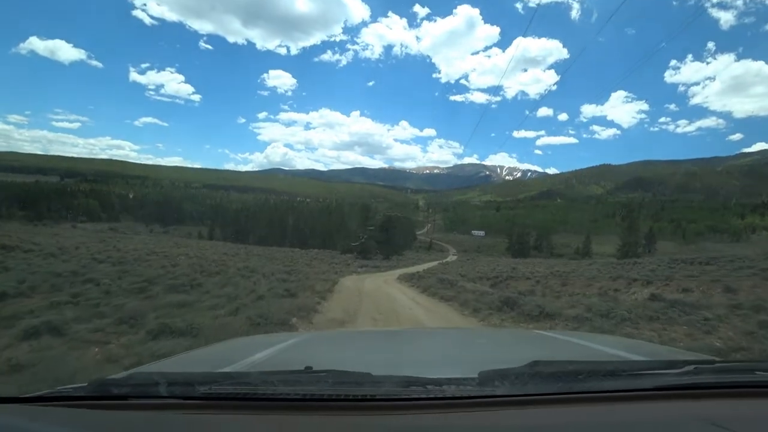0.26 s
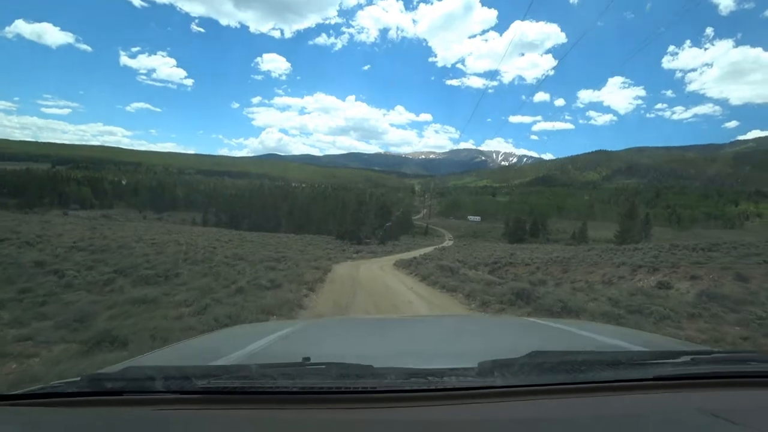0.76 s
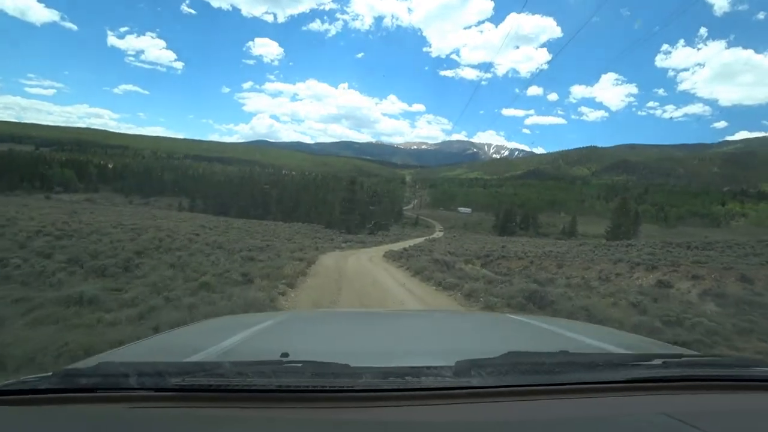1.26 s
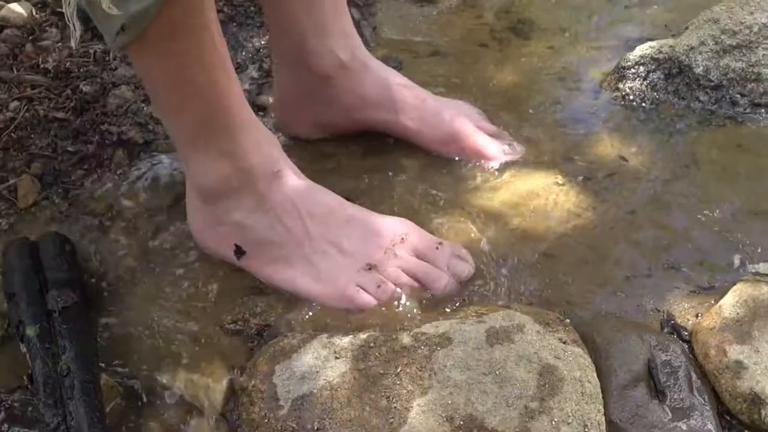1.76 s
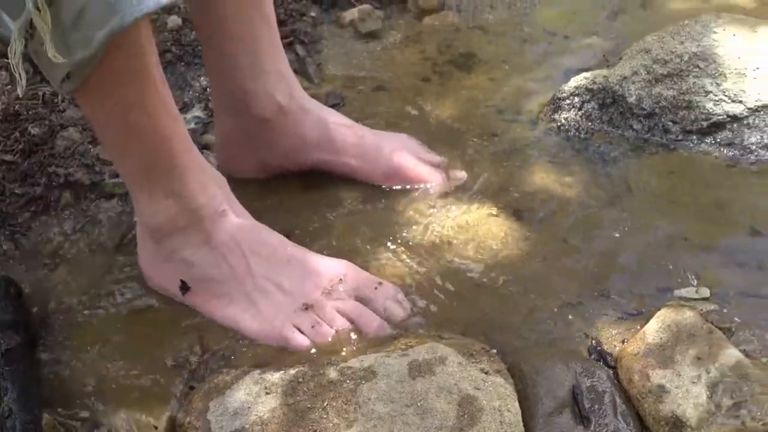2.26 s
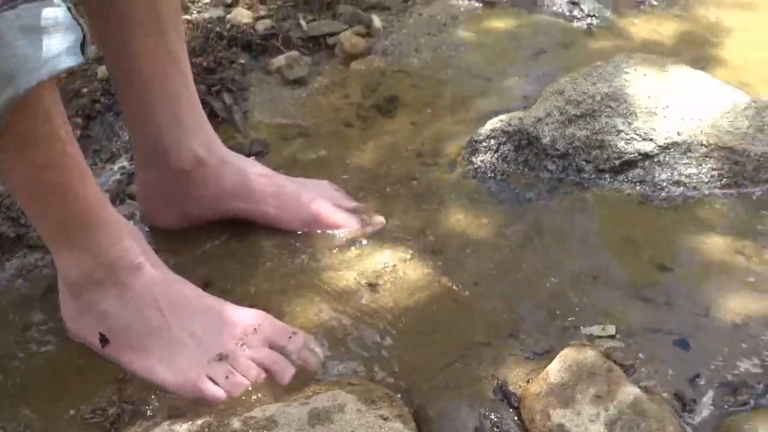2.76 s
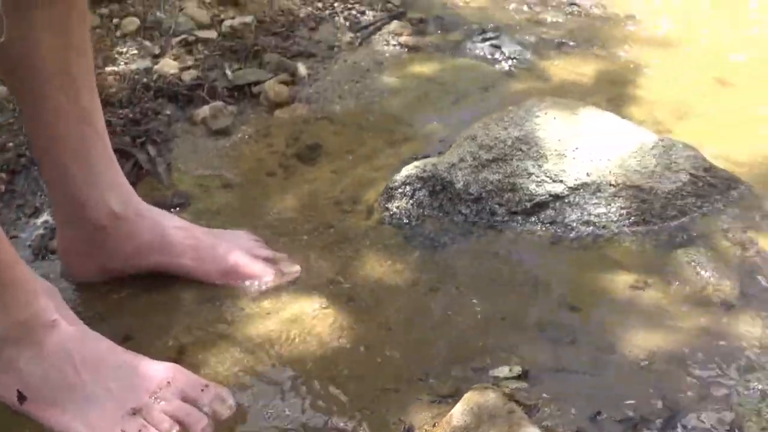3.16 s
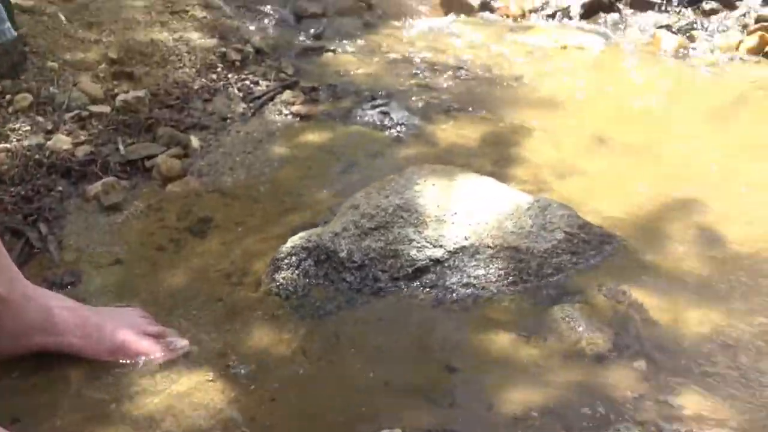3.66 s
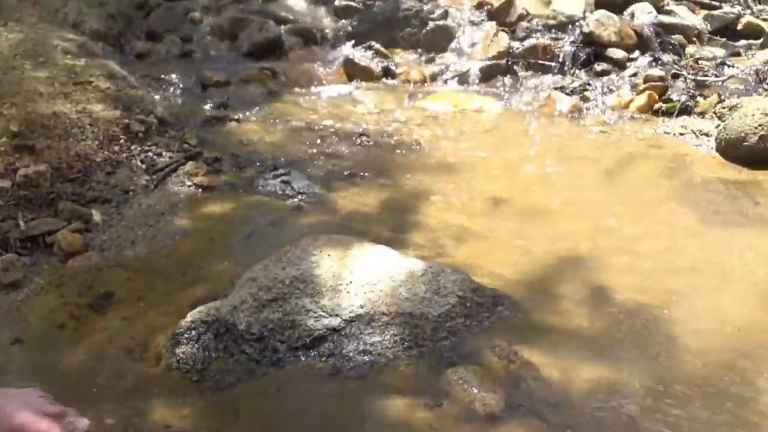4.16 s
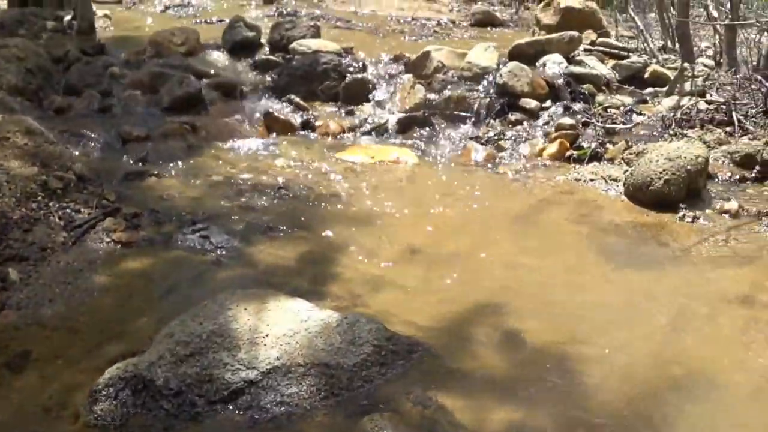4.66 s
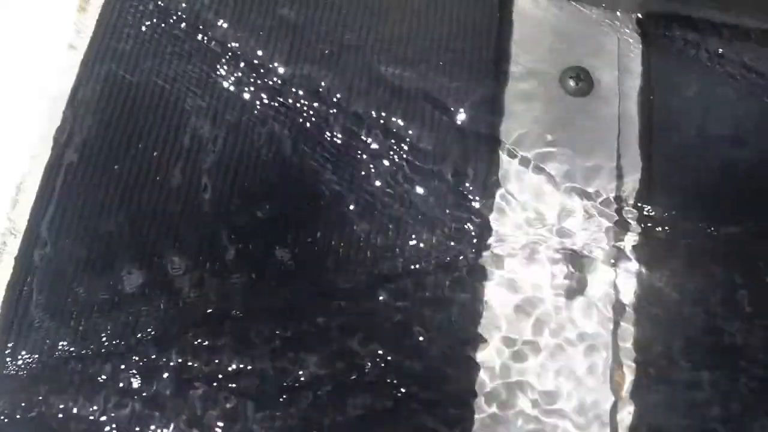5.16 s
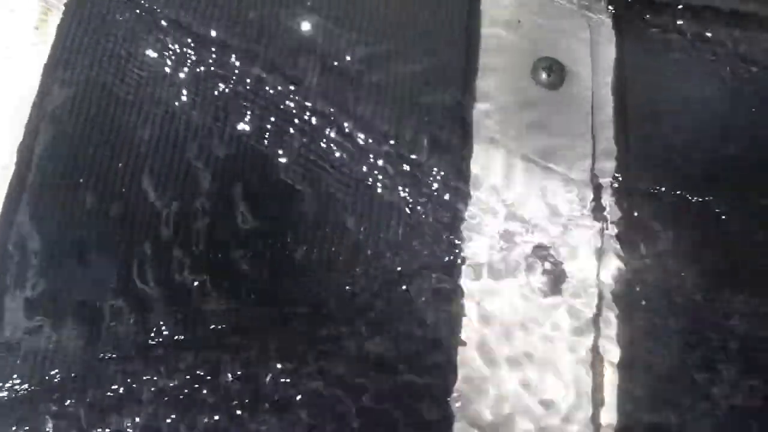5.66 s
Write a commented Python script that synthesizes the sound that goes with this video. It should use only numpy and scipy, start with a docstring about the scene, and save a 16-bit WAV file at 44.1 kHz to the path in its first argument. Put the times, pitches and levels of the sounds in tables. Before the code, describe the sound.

From 0 to about 1.8 s we are inside a car rolling along a dirt road: low-level, muffled, uneven tyre crunch with fine grit, and loose trim giving short hollow knocks at the very start, in a cluster around 0.65 to 0.9 s, at 1.05 s, 1.35 s and 1.5 to 1.6 s. Soft low body booms come near 0.66 and 1.7 s. At 1.8 s it cuts to a shallow creek running over stones, close and much louder: steady fine crackling trickle and spray, rounded low plops, bright high plinks, small splashes and spatters, notably around 2.4, 3.3, 3.7 and 4.7 s. At 5.1 s it cuts to water pouring down a ribbed sluice: fuller, faster, gurgling, slightly hollow, gushing and slackening, with a faint low thump near 5.2 s and more bubbles, ending abruptly at about 5.9 s. The water has only brief, dull reflections.

```python
"""Dirt road, creek and sluice

Three outdoor moments in a row. A car rolls along a dirt road, heard from inside: shaped noise for the tyres,
decaying sines and crunches for the trim knocking on bumps, low sines for the ruts. Then a shallow creek runs
over stones close by, and at last water pours down a ribbed sluice. The water is thousands of short bubble
tones, born in surges, over a noise wash of spray. Single bubbles plop out, the listed ones each with a splash;
now and then the water spatters, and faint short pulses of low noise lie beneath it."""
import sys
import numpy as np
from scipy import signal
from scipy.fft import rfft, irfft
from scipy.io import wavfile
from scipy.ndimage import uniform_filter1d

SR = 44100
rng = np.random.default_rng(int(sys.argv[2]) if len(sys.argv) > 2 else 0)


def log_audio(samples):
    """Write samples as a 16-bit WAV file to the path given in sys.argv[1]."""
    # one column per channel
    frames = np.atleast_2d(samples).T
    # limit to full scale, then quantise
    limited = np.clip(frames, -1, 1)
    pcm = np.round(limited * 32767).astype(np.int16)
    wavfile.write(sys.argv[1], SR, pcm)


N = 260631
TIME = np.arange(N) / SR
FREQS = np.arange(N // 2 + 1) * SR / N

CREEK_START_S, SLUICE_START_S, END_S = 1.775, 5.108, 5.91
CUTOFF_HZ = 11120
# the low gurgle hands over to the high spray here
GURGLE_TOP_HZ = 2800
# below this, left and right grow alike
ALIKE_BELOW_HZ = 570

# tone colour of the cabin noise, relative: (frequency [Hz], density [dB per Hz])
CABIN_COLOUR = [(20, -12.5), (60, -3), (200, -1), (420, 1), (720, 1), (1000, 2.5), (1350, -2.5), (1900, 1),
                (2350, -5), (3100, -9.5), (4500, -14.5), (6200, -17), (8000, -17.5), (11000, -24)]
# left-right likeness in the cabin, before its ceiling: (frequency [Hz], likeness [0-1])
CABIN_LIKENESS = [(60, 1), (130, 1), (270, 1), (560, 0.58), (1180, 0.33), (2490, 0.069), (5260, 0.4),
                  (11100, 1)]
# tyres on dirt, louder over the rough patches: (time [s], level [dB])
ROAD_LEVEL = [(0, -46), (0.27, -47.5), (0.42, -45), (0.57, -47.5), (0.65, -44.5), (0.76, -45),
              (0.84, -48.5), (1.03, -44.5), (1.12, -47.5), (1.16, -47), (1.3, -49), (1.36, -45),
              (1.42, -48), (1.77, -48)]
# trim knocking on bumps: (time [s], level [dB], crunch against the ring before its trim [dB])
KNOCKS = [(0.0189, -33, -31), (0.124, -43, -6), (0.658, -38, -10), (0.664, -36, -12), (0.7095, -34, -14),
          (0.7138, -32.5, -11), (0.815, -40.5, -8), (0.862, -37, -15), (1.0445, -31.5, -22),
          (1.119, -38.5, -12), (1.345, -39, -2), (1.353, -46, -16), (1.517, -39, -27), (1.604, -39, -30)]
# ringing modes of the loose trim: (middle frequency [Hz], relative level [dB], t60 [s])
TRIM_MODES = [(724, -6, 0.04), (940, 1, 0.026), (1130, -10, 0.0088), (1660, 4, 0.0042)]
# the car's body booms over a rut: (time [s], pitch [Hz], level [dB])
RUTS = [(0.657, 310, -50), (1.686, 240, -46.5)]

# flow of the creek, before its trims: (time [s], gurgle [dB], spray [dB])
CREEK_FLOW = [(1.8, -34, -35.5), (1.9, -31.5, -35), (2.0, -34.5, -34), (3.5, -34, -33.5), (3.85, -35, -33),
              (4.25, -35, -32), (5.05, -34, -33)]
# flow of the sluice, slackening between gushes, before its trims: (time [s], gurgle [dB], spray [dB])
SLUICE_FLOW = [(5.13, -26.5, -32.5), (5.3, -25.5, -35), (5.42, -27.5, -34), (5.48, -28, -38),
               (5.55, -26, -32.5), (5.75, -26, -35.5), (5.8, -26.5, -35.5), (5.9, -27, -34)]
# tone colour of the creek, relative: (frequency [Hz], density [dB per Hz])
CREEK_COLOUR = [(70, -23), (130, -26), (200, -23.5), (310, -13), (400, -7), (550, 0.5), (720, -2),
                (1200, -0.5), (2300, -5), (3500, -14), (5400, -19), (7400, -17.5), (9000, -20),
                (11000, -22.5)]
# tone colour of the sluice, relative: (frequency [Hz], density [dB per Hz])
SLUICE_COLOUR = [(70, -47), (130, -36), (220, -29.5), (340, -17.5), (500, -9), (720, -10), (900, -11),
                 (1250, -7.5), (1800, -7), (2700, -7), (4200, -8.5), (6800, -9), (9000, -11.5),
                 (11000, -15)]
# wavelets slop over or draw back in a lull: (time [s], gurgle change [dB], spray change [dB])
WAVELETS = [(1.825, -2, 1), (1.879, -0.5, 0.5), (1.958, -1, 2), (2.0, 0.5, 0.5), (2.335, 2, 1.5),
            (2.445, 0.5, 3), (2.818, 2, 1.5), (2.881, 0.5, 2.5), (2.97, -3.5, -4), (3.006, 0.5, 3),
            (3.147, 3.5, -0.5), (3.262, -1, -2), (3.45, -1.5, 1), (3.48, 1.5, 0), (3.85, -1.5, -1),
            (4.21, 3.5, 2), (4.375, -5.5, -2), (4.423, 2.5, 3.5), (4.53, -1.5, 0), (4.63, -3, 3),
            (4.693, 0.5, 0.5), (4.84, -1, -3), (4.876, 1.5, 1), (5.02, 0, -2), (5.137, 1.5, -0.5),
            (5.266, -0.5, 4.5), (5.408, 3, 3), (5.747, 0.5, 5)]
WAVELET_S = 0.018  # from its height down to 1/e, either side

# the largest, nearest bubbles: (time [s], pitch [Hz], level [dB], time to full swing [cycles])
PLOPS = [(1.7816, 548, -22, 1.56), (1.8549, 626, -30, 1.4), (1.8934, 1760, -26, 3.2), (1.915, 1730, -22, 3),
         (1.92, 1120, -24.5, 2.9), (1.926, 492, -28.5, 2.3), (1.9586, 4440, -23, 1),
         (1.996, 574, -30.5, 2.8), (1.9971, 2800, -28.5, 6.6), (2.083, 4440, -19, 2.8),
         (2.113, 1720, -20, 2.6), (2.123, 541, -26.5, 2.1), (2.148, 2680, -25, 4), (2.1798, 548, -22, 1.13),
         (2.2652, 4320, -26, 6), (2.282, 1210, -24, 0.93), (2.2935, 1130, -27, 0.95),
         (2.326, 3040, -22, 1.8), (2.3475, 5940, -21, 0.6), (2.3703, 9070, -16.5, 0.6),
         (2.3813, 6340, -21, 0.6), (2.3854, 5570, -19.5, 0.72), (2.392, 2360, -13.5, 0.6),
         (2.4041, 4730, -20, 1), (2.4178, 810, -26.9, 4), (2.4279, 2190, -23.5, 3.4),
         (2.455, 5200, -23, 1.4), (2.4968, 3100, -25.5, 1.8), (2.5113, 430, -29.5, 1.2),
         (2.5761, 1200, -26.5, 5.2), (2.585, 7100, -25, 10), (2.6778, 3420, -21, 1.8),
         (2.7156, 587, -30.5, 2.1), (2.7185, 1070, -17, 0.5), (2.722, 2830, -16.5, 0.85),
         (2.735, 4470, -20, 3.2), (2.785, 4730, -22, 1.4), (2.7915, 2160, -25, 5), (2.812, 1580, -27, 4.1),
         (2.9339, 1320, -25, 1.8), (2.9367, 540, -28, 1.6), (2.995, 2900, -23, 1.7),
         (3.0463, 4440, -25, 1.6), (3.0676, 6700, -13, 1.8), (3.0993, 1740, -21, 1.8),
         (3.1051, 3480, -19, 2.2), (3.142, 1310, -29, 6.4), (3.1561, 7400, -17, 2),
         (3.2795, 4670, -21, 2.3), (3.2967, 7960, -18, 0.85), (3.315, 830, -24.5, 2.3),
         (3.3238, 610, -23, 1.3), (3.3327, 2380, -20.5, 1.7), (3.3417, 6460, -21, 2.8),
         (3.4102, 1060, -24, 0.93), (3.474, 1980, -21, 0.99), (3.4816, 2470, -21, 1.8),
         (3.5078, 516, -25.5, 1.1), (3.514, 10000, -20, 1.5), (3.5155, 1220, -24, 2.9),
         (3.5385, 1130, -23, 0.49), (3.5829, 770, -24, 0.85), (3.607, 970, -27, 2),
         (3.628, 4560, -14.5, 2.6), (3.682, 6550, -12, 1.3), (3.687, 3570, -8, 1.5),
         (3.7251, 7560, -20.5, 2), (3.7857, 565, -27, 2.2), (3.882, 7160, -19, 3), (3.9221, 8300, -13, 1.8),
         (3.923, 3530, -16.5, 1.3), (3.939, 2500, -22, 4), (4.0009, 587, -27.5, 2.5),
         (4.0098, 2740, -24.5, 4), (4.058, 2470, -19, 1.3), (4.0742, 2350, -24.6, 2.3),
         (4.076, 4440, -19.2, 0.65), (4.086, 7900, -21, 3), (4.2045, 1480, -21.5, 3.3),
         (4.2287, 7460, -19, 5.2), (4.2888, 3000, -21, 1.1), (4.3076, 2910, -20, 0.85),
         (4.3334, 3000, -24, 1.1), (4.3868, 500, -27.5, 2), (4.4183, 2080, -23, 3),
         (4.419, 3900, -18.5, 0.6), (4.471, 4290, -17, 1), (4.4964, 4160, -14, 0.54),
         (4.5013, 5220, -19.8, 0.85), (4.504, 10100, -11.5, 2), (4.528, 2320, -15, 1.9),
         (4.53, 4890, -18, 1.3), (4.5582, 9900, -19, 1.3), (4.6014, 8230, -15.5, 1.6),
         (4.626, 7220, -19, 1.1), (4.6328, 3620, -24, 3.7), (4.6874, 2110, -11.5, 1.4),
         (4.6978, 5200, -16, 1.9), (4.7045, 6100, -15, 1.2), (4.7582, 7460, -20, 1.8),
         (4.8694, 3400, -23.5, 5.1), (4.874, 10000, -17, 0.6), (4.9614, 6700, -17.5, 1.8),
         (4.99, 2500, -16.5, 1.2), (5.058, 542, -31, 1.6), (5.0949, 3060, -13.5, 1.2),
         (5.1088, 2800, -14, 0.6), (5.1343, 6800, -19.5, 4.4), (5.138, 1650, -18, 0.7),
         (5.19, 760, -25, 2.1), (5.206, 630, -15, 0.49), (5.221, 3550, -19.5, 1.6),
         (5.222, 9000, -14.5, 0.86), (5.2429, 500, -25, 1.7), (5.267, 755, -25.5, 1.3),
         (5.294, 2280, -18, 2.4), (5.306, 656, -16, 1.2), (5.314, 580, -23.5, 1.9),
         (5.351, 1620, -17.5, 1.5), (5.3794, 544, -23, 2), (5.4108, 680, -19.5, 0.95),
         (5.41, 5200, -14.5, 0.69), (5.4137, 1980, -21, 1.8), (5.42, 1060, -21.5, 1.1),
         (5.491, 4890, -20, 1.5), (5.517, 1830, -25, 3), (5.5636, 6340, -19, 0.84),
         (5.5828, 10300, -13, 1.6), (5.654, 2640, -24, 3), (5.6852, 720, -19.5, 1.9),
         (5.696, 490, -25, 1.6), (5.7051, 720, -23.5, 3.8), (5.735, 5940, -15, 0.75),
         (5.7452, 1640, -19, 1.6), (5.7485, 6550, -18, 2.5), (5.7552, 1790, -18.5, 1.8),
         (5.786, 498, -27.5, 2), (5.81, 2570, -21, 1.4), (5.8662, 6500, -13.5, 3.4)]
# lesser chance bubbles, low: (rate [per s], middle pitch [Hz], spread either way [octaves],
# middle level [dB], middle time to full swing [cycles])
GLUGS = (10, 950, 0.7, -33, 2.6)
# lesser chance bubbles, high: (rate [per s], middle pitch [Hz], spread either way [octaves],
# middle level [dB], middle time to full swing [cycles])
PLINKS = (12, 6000, 0.8, -29, 2.2)
STRAY_SPREAD_DB = 3  # either way
# a plop's splash: level against the plop, fade, reach either side of its pitch
SPLASH_DB, SPLASH_FADE_S, SPLASH_OCTAVES = -13.5, 0.0052, 0.65
# water slaps a stone or a rib: (time [s], middle pitch [Hz], starting level [dB], fade [s])
SPATTERS = [(1.872, 3600, -31, 0.014), (1.957, 5800, -32, 0.003), (2.043, 3000, -26, 0.007),
            (2.392, 3000, -30, 0.006), (2.676, 3500, -25, 0.005), (3.278, 5200, -23.5, 0.004),
            (3.318, 895, -29, 0.011), (3.47, 2220, -24.5, 0.0084), (4.201, 1900, -29, 0.008),
            (4.335, 2900, -30, 0.0076), (4.418, 2900, -28, 0.005), (4.495, 4400, -34, 0.0072),
            (4.688, 2370, -20, 0.0042), (4.870, 3400, -28, 0.0048), (5.134, 4500, -26, 0.006),
            (5.352, 2100, -31, 0.0045), (5.744, 1800, -26, 0.016)]
DROPLETS_PER_S, SPATTER_OCTAVES = 2500, 0.58
# faint low noise pulses: (time [s], level [dB], time to peak and fade [s])
LOW_PULSES = [(2.033, -66, 0.008), (3.267, -68, 0.008), (3.63, -65, 0.01), (3.665, -63, 0.005),
              (3.912, -66, 0.0079), (4.55, -74, 0.03), (4.686, -62, 0.0057), (4.855, -61, 0.0044),
              (5.1, -63, 0.02), (5.174, -45, 0.003), (5.206, -39, 0.0018), (5.86, -64, 0.0092)]
# standing waves in the trough, peaks and notches: (frequency [Hz], width [Hz], gain [dB])
TROUGH = [(570, 50, 1.5), (606, 32, -8), (720, 91, 6.5), (970, 51, 3.5)]


def from_db(db):
    """Decibels to gain."""
    return 10 ** (np.asarray(db) / 20)


def rms_one(x):
    """Scale to unit power."""
    return x / np.sqrt(np.mean(x ** 2) + 1e-20)


def in_time(rows):
    """Read each column of a curve at every sample."""
    s, *columns = np.transpose(rows)
    return [np.interp(TIME, s, column) for column in columns]


def at_hz(points, hz):
    """Read a spectrum on a log-frequency axis."""
    known, values = np.transpose(points)
    return np.interp(np.log(hz + 1), np.log(known + 1), values)


def shaped(x, gain):
    """Filter by a gain at each frequency."""
    return irfft(rfft(x) * gain, N)


def high_pass(x, hz):
    """Roll off the bass steeply."""
    return signal.sosfilt(signal.butter(4, hz, "high", fs=SR, output="sos"), x)


def stereo_noise(alike):
    """White noise whose two channels correlate by the given likeness."""
    mid, side = rng.standard_normal((2, N))
    shared = shaped(mid, np.sqrt((1 + alike) / 2))
    opposed = shaped(side, np.sqrt((1 - alike) / 2))
    return shared + opposed * [[1], [-1]]


def between(start, end):
    """Open from start to end."""
    return (TIME >= start) & (TIME < end)


def add(out, s, sound):
    """Mix a sound in at a time, cut off at the end of the scene."""
    at = int(s * SR)
    room = out[:, at:at + sound.shape[-1]]
    room += sound[..., :room.shape[-1]]


def swell_and_fade(t, fade_s):
    """A pulse that peaks at 1 after fade_s and then dies away."""
    return t / fade_s * np.exp(1 - t / fade_s)


def breaking(rate, fade_s):
    """Random bursts that start at once and fade, as a control curve; mean 0, spread 1."""
    chance, size = rng.random((2, N))
    hits = (chance < rate / SR) * (.5 + size) + 1e-18
    swell = signal.lfilter([1], [1, -np.exp(-1 / (fade_s * SR))], hits)
    return rms_one(swell - swell.mean())


def car(flurry_db=2.5, grit_hz=4000, grit_db=-3.0):
    """Tyres crunch over the dirt in small bursts and fling flurries of fine grit; the cabin dulls the sound."""
    alike = np.sqrt(np.minimum(at_hz(CABIN_LIKENESS, FREQS), .82))
    tyres = stereo_noise(alike) * from_db(1.3 * breaking(rate=150, fade_s=.007))
    fine = 1 / (1 + (grit_hz / (FREQS + 1)) ** 4)
    flurries = breaking(rate=60, fade_s=.008)
    grit = shaped(tyres, fine) * from_db(flurry_db * flurries + grit_db)
    coarse = shaped(tyres, 1 - fine)
    cabin = shaped(coarse + grit, from_db(at_hz(CABIN_COLOUR, FREQS)))
    # the road level refers to the sound above the bass
    body = np.std(shaped(cabin, FREQS > 300))
    road_db, = in_time(ROAD_LEVEL)
    return cabin / body * from_db(road_db)


def trim_ring(t):
    """The trim's modes ring as decaying sines, each slightly off its middle frequency at every hit."""
    ring = 0
    for k, (hz, mode_db, t60) in enumerate(TRIM_MODES):
        hit_hz = hz * (1 + 0.084 * rng.standard_normal())
        ring = ring + (-1) ** k * from_db(mode_db - 60 * t / t60) * np.sin(2 * np.pi * hit_hz * t)
    return ring


def knocks(crunch_db=4, attack_s=0.00048, crunch_hz=3300, crunch_t60=0.042):
    """Loose trim hits once at each bump: a hollow ring and a dull crunch of band-limited noise."""
    out, t = np.zeros((2, N)), TIME[:SR // 8]
    band = signal.butter(4, [800, crunch_hz], "band", fs=SR, output="sos")
    for s, level_db, bright_db in KNOCKS:
        ring = trim_ring(t)
        # mostly shared, partly its own in each channel
        chatter = rng.standard_normal(len(t)) + 0.57 * rng.standard_normal((2, len(t)))
        crunch = rms_one(signal.sosfilt(band, chatter))
        blow = from_db(crunch_db + bright_db - 60 * t / crunch_t60) * (1 - np.exp(-t / attack_s))
        add(out, s, from_db(level_db) * (ring + blow * crunch))
    return out


def ruts(fade_s=0.01):
    """A wheel drops into a rut and the body panels boom for a few cycles."""
    out, t = np.zeros((2, N)), TIME[:SR // 8]
    for s, hz, level_db in RUTS:
        add(out, s, from_db(level_db) * swell_and_fade(t, fade_s) * np.sin(2 * np.pi * hz * t))
    return out


def bubble(hz, cycles, rise):
    """A trapped air pocket swells into ringing and dies; its pitch climbs as it nears the surface."""
    cycles = max(cycles, .5)
    turns = np.arange(int(8 * cycles * SR / hz) + 2) * hz / SR
    age = turns / cycles  # 1 at full swing, where the pitch passes hz
    return age * np.exp(1 - age) * np.sin(2 * np.pi * turns * (1 + rise * (age / 2 - 1)))


def surges(shared_db, own_db, rate, fade_s, count=6):
    """Swells in dB per octave: one for all bubble sizes, plus ones shared by neighbouring octaves."""
    own = np.array([breaking(rate, fade_s) for k in range(count + 1)])
    neighbours = (own[1:] + own[:-1]) / np.sqrt(2)
    return shared_db * breaking(rate, fade_s) + own_db * neighbours


def octave_zone(hz, count):
    """Number the octaves upward from 250 Hz, the outer ones taking in all beyond."""
    return np.clip(np.log2(hz / 250 + 1e-9).astype(int), 0, count - 1)


def bubble_cloud(start, end, surge_db, spread_db, cycles, width, count):
    """Small bubbles all across the stream, louder where a surge passes; equal power per Hz."""
    out = np.zeros((2, N))
    when, pitch, place = rng.random((3, count))
    size, damping = np.clip(rng.standard_normal((2, count)), -2, 2)
    s = start + when * (end - start)
    hz = (15 + 93 * pitch) ** 2
    zone = octave_zone(hz, len(surge_db))
    level_db = spread_db * size + surge_db[zone, np.minimum((s * SR).astype(int), N - 1)]
    rings = cycles * from_db(3 * damping) * (hz / 1000) ** 0.18
    # higher and shorter bubbles start taller, to even out the power
    height = from_db(level_db) * (hz / 1000) ** .25 * np.sqrt(hz / rings)
    pan = width * (2 * place - 1)
    for k in range(count):
        sides = [1 + pan[k], 1 - pan[k]]
        add(out, s[k], height[k] * np.outer(sides, bubble(hz[k], rings[k], rise=0.028)))
    return rms_one(out)


def wash(start, end, surge_db, alike):
    """Spray and far ripples merge into noise that swells with the surges, octave by octave."""
    white, out = rfft(stereo_noise(alike)), 0
    zone = octave_zone(FREQS, len(surge_db))
    for k, swell_db in enumerate(surge_db):
        octave = irfft(white * (zone == k) * (FREQS < CUTOFF_HZ), N)
        out = out + from_db(swell_db) * octave
    return rms_one(out * between(start, end))


def wavelets():
    """Brief swells and lulls of the gurgle and of the spray, in dB."""
    return sum(np.outer([low_db, high_db], np.exp(-((TIME - s) / WAVELET_S) ** 2))
               for s, low_db, high_db in WAVELETS)


def running_water(source, colour, flow, start, end, gurgle_db, spray_db, lowest_hz=150):
    """Colour the bubbling, then let the current set the strength of its low gurgle and its high spray."""
    heard, out = between(start, end), 0
    tint = from_db(at_hz(colour, FREQS))
    low = 1 / (1 + (FREQS / GURGLE_TOP_HZ) ** 8)
    open_share = uniform_filter1d(heard * 1., size=2205) + 1e-9
    levels_db = in_time(flow) + wavelets()
    for share, level_db, trim_db in zip((low, 1 - low), levels_db, (gurgle_db, spray_db)):
        part = shaped(source, tint * share) * heard
        # the current carries a steady power over a twentieth of a second, however the bubbles fall
        power = uniform_filter1d(np.mean(part ** 2, axis=0), size=2205) / open_share
        out = out + part / np.sqrt(np.abs(power) + 1e-15) * from_db(level_db + trim_db)
    return high_pass(out, lowest_hz)


def creek():
    """Shallow water trickles over stones: a fine crackle, and rounder bubbles that ring longer."""
    span = CREEK_START_S, SLUICE_START_S
    surge_db = surges(shared_db=0.37, own_db=0.65, rate=98, fade_s=0.024)
    crackle = bubble_cloud(*span, surge_db, spread_db=-0.5, cycles=0.7, width=0.15, count=7000)
    trickle = bubble_cloud(*span, surge_db, spread_db=2, cycles=2.7, width=.65, count=3400)
    spray = wash(*span, surge_db, alike=1.0)
    water = crackle + from_db(1.5) * trickle + from_db(-1) * spray
    return running_water(water, CREEK_COLOUR, CREEK_FLOW, *span, gurgle_db=-0.06, spray_db=-1.9)


def stray_bubbles(per_s, hz, octaves, level_db, cycles):
    """Rows of chance bubbles that come in clumps and gaps; the ones that ring longer start softer."""
    wait, pitch, size, damping = rng.random((400, 4)).T
    s = CREEK_START_S + np.cumsum(-np.log(1 - wait)) / per_s
    longer = 2 ** (2 * damping - 1)
    row_db = level_db + STRAY_SPREAD_DB * (2 * size - 1) - 10 * np.log10(longer)
    pitch_hz = np.minimum(hz * 2 ** (octaves * (2 * pitch - 1)), CUTOFF_HZ)
    return np.transpose([s, pitch_hz, row_db, cycles * longer])[s < END_S]


def droplet_band(x, hz, octaves):
    """Keep the noise within some octaves either side of a pitch."""
    edges = hz * 2 ** (octaves * np.array([-1, 1]))
    return signal.sosfilt(signal.butter(2, edges, "band", fs=SR, output="sos"), x)


def splash(hz):
    """Droplets fall back around a bubble: a fading patter of noise near its pitch."""
    t = TIME[:SR // 20]
    patter = droplet_band(rng.standard_normal(len(t)), hz, SPLASH_OCTAVES)
    return from_db(SPLASH_DB) * rms_one(patter) * np.exp(-t / SPLASH_FADE_S)


def plops(lowest_hz=240, rise=0.0057):
    """Single bubbles that stand out of the stream; they are too small to radiate bass."""
    out = np.zeros((2, N))
    rows = [*PLOPS, *stray_bubbles(*GLUGS), *stray_bubbles(*PLINKS)]
    pans_db = rng.normal(0, 1.0, 1000)
    for (s, hz, level_db, cycles), pan_db in zip(rows, pans_db):
        sides = from_db([level_db + pan_db, level_db - pan_db])
        add(out, s, np.outer(sides, bubble(hz, cycles, rise)))
    for s, hz, level_db, cycles in PLOPS:
        add(out, s, from_db(level_db) * splash(hz))
    return high_pass(out, lowest_hz)


def spatters():
    """Water bursts into droplets: sparse random clicks, band-passed to ring briefly, fading in level."""
    out, t = np.zeros((2, N)), TIME[:SR // 16]
    for s, hz, level_db, fade_s in SPATTERS:
        chance, size = rng.random(len(t)), rng.standard_normal(len(t))
        drops = droplet_band(size * (chance < DROPLETS_PER_S / SR), hz, SPATTER_OCTAVES)
        fade = np.exp(-t / fade_s)
        add(out, s, from_db(level_db) * rms_one(drops * fade) * np.sqrt(np.mean(fade ** 2)))
    return out


def low_pulses(top_hz=110):
    """Faint pulses of levelled low noise, each swelling and fading briefly."""
    out, t = np.zeros((2, N)), TIME[:SR // 4]
    rumble = shaped(rng.standard_normal(N), 1 / (1 + (FREQS / top_hz) ** 4))
    rumble /= np.sqrt(np.abs(uniform_filter1d(rumble ** 2, size=700)) + 1e-12)
    for s, level_db, fade_s in LOW_PULSES:
        add(out, s, from_db(level_db) * swell_and_fade(t, fade_s))
    return out * rumble


def sluice():
    """A faster sheet of water tumbles over the ribs and gulps air; the trough rings with it."""
    span = SLUICE_START_S, END_S
    surge_db = surges(shared_db=0.57, own_db=2.0, rate=71, fade_s=0.0038)
    cloud = bubble_cloud(*span, surge_db, spread_db=3.0, cycles=1.84, width=0.82, count=2300)
    spray = from_db(0.5) * wash(*span, surge_db, alike=0.91)
    trough = 1
    for hz, width, gain_db in TROUGH:
        trough = trough * (1 + (from_db(gain_db) - 1) / (1 + 2j * (FREQS - hz) / width))
    water = shaped(cloud + spray, trough)
    return running_water(water, SLUICE_COLOUR, SLUICE_FLOW, *span, gurgle_db=-3.5, spray_db=0.1)


def stones(x, echo_db=-18, t60=0.11, count=120):
    """Stones and banks throw back a brief scatter of dull echoes, different at each ear."""
    delay, sign = rng.uniform(.002, .06, count), rng.choice([-1, 1], count)
    echoes = np.zeros((2, N))
    strength = sign + rng.standard_normal((2, count))
    echoes[:, (delay * SR).astype(int)] = from_db(-60 * delay / t60) * strength
    echoes *= from_db(echo_db) / np.sqrt(np.sum(echoes ** 2) / 2)
    dull = shaped(echoes, 1 / (1 + 1j * FREQS / 7000))[:, :SR // 10]
    return x + signal.oaconvolve(x, dull, axes=1)[:, :N]


def narrow_bass(x):
    """The difference between left and right fades out in the bass, so long waves sound alike."""
    mid = x.mean(axis=0)
    return mid + shaped(x - mid, FREQS / np.hypot(FREQS, ALIKE_BELOW_HZ))


def scene():
    """The drive a touch left, the creek a little to the right, the sluice almost straight ahead."""
    drive = (car() + knocks() + ruts()) * between(0, CREEK_START_S) * from_db([[.5], [-.5]])
    water = narrow_bass(stones(creek() + sluice() + plops() + spatters()))
    pan_db = np.interp(TIME, [2, 5, 5.3], [-1.2, -.5, .2])
    water = water * from_db([pan_db, -pan_db])
    # phase shift [radians]: the right channel runs ahead and the left behind by this much
    lead = np.interp(FREQS, [0, 300, 5500, 7000], [0.57, 0.25, 0.28, 0.0])
    return drive + low_pulses() + shaped(water, np.exp(1j * np.outer([-1, 1], lead)))


def record(dry):
    """Cut the top steeply."""
    return signal.sosfilt(signal.ellip(12, .1, 75, CUTOFF_HZ, fs=SR, output="sos"), dry)


dry = scene()
out = record(dry)
log_audio(out)
```